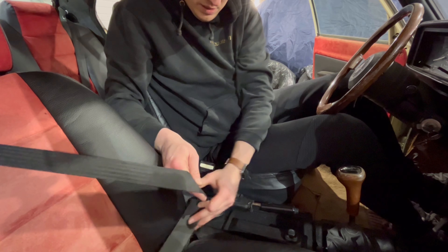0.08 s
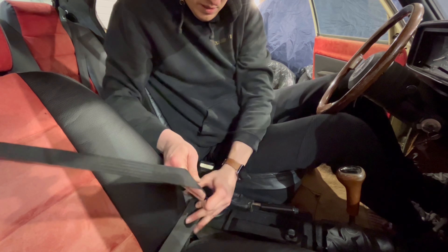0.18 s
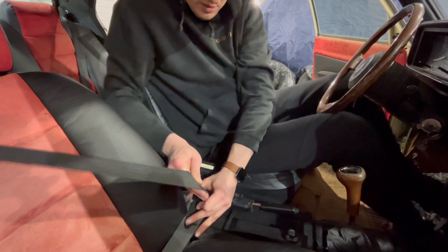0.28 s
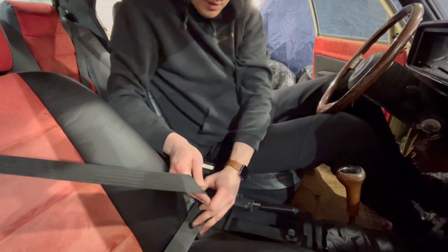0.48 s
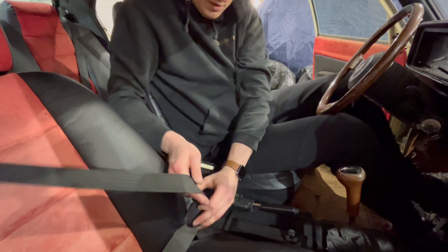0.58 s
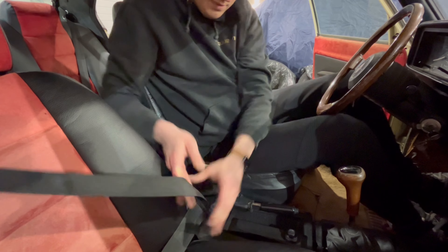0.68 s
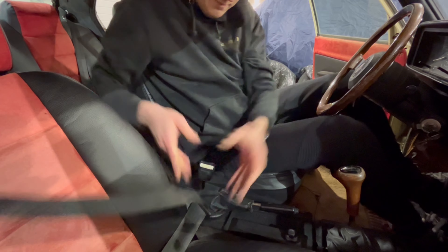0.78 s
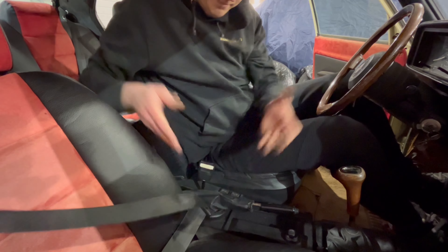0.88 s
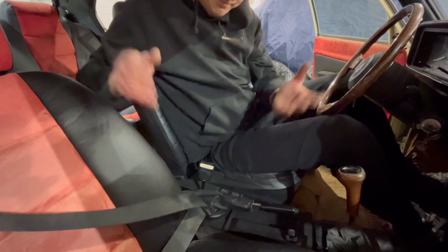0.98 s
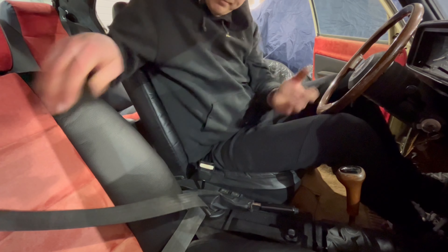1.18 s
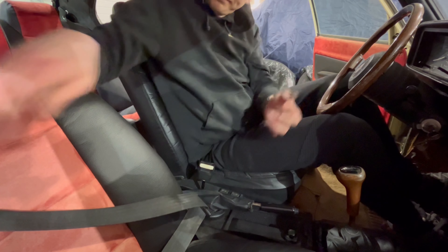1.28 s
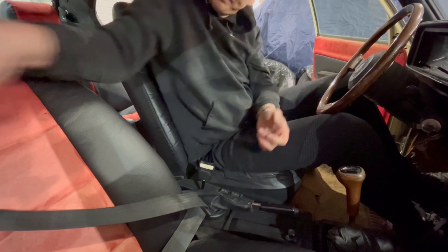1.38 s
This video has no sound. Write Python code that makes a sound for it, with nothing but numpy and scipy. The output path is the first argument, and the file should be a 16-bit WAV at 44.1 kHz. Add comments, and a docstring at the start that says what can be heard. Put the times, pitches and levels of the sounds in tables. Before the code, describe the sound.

A seat belt clicks into its buckle with rustling sleeves inside a parked car.

```python
"""A seat belt is fastened inside a parked car. Over a faint hiss, sleeves rustle, the belt slides and a body
shifts on the seat. The steel tongue (the belt's metal tip) taps at the buckle, then knocks along the slot as
the cabin booms softly. At 0.3 s the latch snaps shut and its steel rings briefly. The hands let go with a few
lighter taps and thuds. The small cabin gives each click a short echo."""
import sys
import numpy as np
from scipy import signal
from scipy.fft import rfft, irfft
from scipy.io import wavfile

SR = 44100
rng = np.random.default_rng(int(sys.argv[2]) if len(sys.argv) > 2 else 0)


def dump_mix(stems):
    """Bounce the given channels to the path in sys.argv[1] as a 16-bit WAV at rate SR."""
    frames = np.atleast_2d(stems).T  # one column per channel
    limited = np.clip(frames, -1, 1)  # hard clip at full scale
    pcm = np.round(limited * 32767).astype(np.int16)
    wavfile.write(sys.argv[1], SR, pcm)


N = 61740  # 1.4 s

# How alike the two ears' noise is, 1 meaning the same (frequency [Hz], likeness [-1 to 1])
EAR_LIKENESS = [(60, .95), (130, 1), (300, 0.33), (600, 0.22), (1200, 0.02), (5000, -0.13), (12000, .3)]
# Which side nearby sounds lean to (frequency [Hz], left minus right [dB])
NEAR_SIDES = [(60, -4), (200, -0.5), (700, 2.5), (1300, 3.6), (2400, 2), (4400, 8.5), (8000, -0.5),
              (15000, -1)]
# Tone colour of the hiss: how strong its lows and highs are (frequency [Hz], level [dB])
HISS_COLOUR = [(20, -12), (70, 7.5), (180, -10), (300, -21), (500, -18), (750, -8), (1000, -1.5),
               (1230, -3), (1600, -7.5), (2200, -13.5), (6000, -23.5), (16000, -32)]
# Which side the hiss leans to (frequency [Hz], left minus right [dB])
HISS_SIDES = [(100, -6), (700, -2.5), (1290, 16), (2400, 6), (4400, 1.5), (8000, -6)]
# Loudness of the rubbing sleeves (time [s], level [dB])
SLEEVE_LEVELS = [(0, -53), (0.06, -46.5), (0.12, -48.5), (0.2, -48), (0.27, -47.5), (0.4, -58.5),
                 (0.48, -73), (0.56, -59.5), (0.639, -62.5), (0.75, -59), (0.79, -65), (0.83, -63),
                 (0.9, -74), (1.049, -77), (1.14, -79.5), (1.34, -77), (1.39, -71)]
# Tone colour of the sleeves (frequency [Hz], level [dB])
SLEEVE_COLOUR = [(200, -12.5), (500, -9), (900, 4), (1500, 4.5), (2400, -3), (4500, -4.5), (7000, -11.5),
                 (12700, -20), (16000, -29)]
# Loudness of the sliding belt (time [s], level [dB])
BELT_LEVELS = [(0, -64), (0.17, -52.5), (0.28, -62), (0.4, -64.5), (0.48, -72), (0.57, -70), (0.64, -61.5),
               (0.72, -66), (0.79, -65.5), (0.82, -65.5), (0.87, -71.5), (0.98, -73.5), (1.07, -69.5),
               (1.14, -83), (1.34, -76.5), (1.39, -64.5)]
# Tone colour of the belt (frequency [Hz], level [dB])
BELT_COLOUR = [(500, -10), (2000, -8.5), (5500, 6.5), (8500, -0.5), (10500, -2.5), (12800, 3.5),
               (15000, -7), (16000, -13)]
# Loudness of the body rubbing on the seat (time [s], level [dB])
BODY_LEVELS = [(0, -57), (0.07, -66.5), (0.088, -42.5), (0.188, -47.5), (0.225, -42), (0.291, -36),
               (0.34, -39), (0.401, -49), (0.5, -52.5), (0.62, -61), (0.719, -68), (0.83, -65.5),
               (0.95, -74), (1.4, -70.5)]
# Tone colour of that rubbing (frequency [Hz], level [dB])
BODY_COLOUR = [(20, -12.5), (45, 4.5), (85, 6.5), (150, -2), (240, -1.5), (330, -13), (600, -12.5),
               (1000, -23.5), (3000, -52.5)]
# Light taps of tongue, buckle and belt (time [s], level [dB], brightness [dB/octave], ring [dB])
LIGHT_TAPS = [(0.0223, -43.5, -1, 5), (0.0742, -36.5, 0, -3.5), (0.081, -40.5, -42, -10),
              (0.0897, -33, -0.5, 1), (0.1054, -35.5, 3.5, -2), (0.134, -40, -12, -25),
              (0.1575, -43.5, 6.5, -42), (0.4352, -40.5, 2, -23), (0.4594, -49, -0.5, -42),
              (0.5087, -46.5, 0.5, -36), (0.8005, -51, -2.5, -12), (0.81, -51.5, 2, -46),
              (0.821, -69, 0, -14), (0.8764, -58, 3, 0)]
# Tone colour of a tap (frequency [Hz], level [dB])
LIGHT_TAP_COLOUR = [(150, -21), (450, 9), (900, 4), (1600, -2.5), (2400, -6), (5500, -6), (8000, -9.5),
                    (10500, -17.5), (12500, -7.5), (16000, -30)]
# Notes of the loose tongue; a fade is the time to drop 60 dB (pitch [Hz], level [dB], fade [s])
TONGUE_NOTES = [(1230, -11, 0.12), (1555, -10, 0.15), (1610, -5.5, 0.15), (1630, -5.5, 0.045),
                (4970, -20, 0.027)]
# Soft low booms of the cabin (time [s], level [dB], pitch [Hz], fade [s])
CABIN_THUDS = [(0.086, -52, 99, 0.18), (0.128, -65, 119, 0.045), (0.186, -54, 86.5, 0.09),
               (0.217, -21.5, 132.8, 0.28), (0.245, -26, 83.5, 0.29), (0.281, -37, 127.4, 0.14),
               (0.311, -26.5, 176.7, 0.066), (0.334, -33.5, 89.5, 0.12), (0.444, -22.5, 143, 0.056),
               (0.467, -40.5, 89.9, 0.47), (0.552, -43.5, 85.8, 0.35), (0.749, -36.5, 81.4, 0.18),
               (0.797, -33.5, 188.7, 0.05), (0.813, -48.5, 89, 0.29), (1.039, -49.5, 83, 0.24),
               (1.178, -51.5, 137.6, 0.11)]
# The tongue knocking along the slot (time [s], level [dB], brightness [dB/octave], ring [dB])
KNOCKS = [(0.2043, -29, -1.5, -7.5), (0.2075, -28, 6.5, -11), (0.2090, -26, 1.5, 2.5), (0.2175, -26, -2, 5),
          (0.2265, -20.5, -1.5, -17)]
# Tone colour of a knock (frequency [Hz], level [dB])
KNOCK_COLOUR = [(150, 15.5), (350, -7.5), (600, -2), (1100, -3), (1600, 3), (2400, -4), (3300, -1),
                (5000, -10), (8000, -9), (10500, -19), (13000, -16.5), (16000, -36)]
# Notes of the buckle's case (pitch [Hz], level [dB], fade [s])
CASE_NOTES = [(334, -10, .17), (420, -11, .14), (535, -5, .07), (750, -14, .07), (954, -2, .07),
              (1086, -3, .06), (1148, -4, .06), (1500, -13, .04), (1598, -15, .08), (3250, -17, .025)]
# The latch's snap and bounces (time [s], level [dB], brightness [dB/octave], ring [dB])
SNAPS = [(0.3027, -17, 1, -7.5), (0.3047, -17.5, 2.5, -3.5), (0.3074, -21, 5.5, -1.5),
         (0.3142, -30, -0.5, 2.5), (0.3245, -28.5, -3.5, -13), (0.3312, -32.5, -6.5, -5)]
# Tone colour of a snap (frequency [Hz], level [dB])
SNAP_COLOUR = [(150, -14.5), (500, -13), (850, -22.5), (1150, -8), (1600, 5.5), (2500, -8.5), (3100, 3),
               (3500, -0.5), (4200, -6), (7000, -7), (9500, -13), (11800, -4), (14000, -15.5),
               (16000, -30.5)]
# Notes of the steel latch and tongue (pitch [Hz], level [dB], fade [s])
STEEL_NOTES = [(1095, -5, .04), (1150, -2, .05), (1478, -9, .08), (1594, -7, .07), (1660, -8, .03),
               (2077, -8, .03), (3080, -7, .02), (3272, -6, .045), (3680, -12, .035), (4082, -10, .035),
               (4930, -15, .03), (5800, -15, .025), (10200, -17, .02), (11750, -11, .015)]
# How long the cabin echoes (frequency [Hz], fade [s])
ECHO_FADES = [(100, 0.21), (500, 0.13), (1400, 0.72), (3000, 0.57), (8000, 0.93), (15000, .3)]
# Tone colour of the echo (frequency [Hz], level [dB])
ECHO_COLOUR = [(100, -1.5), (500, -8.5), (1150, -20), (1600, -19.5), (3000, -26.5), (8000, -26.5),
               (15000, -40)]


def amp(db):
    """Turns decibels into a number to multiply by."""
    return 10 ** (np.asarray(db) / 20)


def read(table, hz):
    """Looks up a frequency in a table, gliding between its rows."""
    freqs, values = np.transpose(table)
    return np.interp(np.log(hz + 1), np.log(freqs + 1), values)


def loudness(table):
    """Turns (time, level) rows into a volume for every sample."""
    return amp(np.interp(np.arange(N) / SR, *np.transpose(table)))


def pan(db):
    """Left and right volumes, with the left louder by db."""
    return amp(np.array([[.5], [-.5]]) * db)


def add(mix, start_s, sound):
    """Mixes a sound in at the given time."""
    part = mix[:, max(round(start_s * SR), 0):][:, :sound.shape[1]]
    part += sound[:, :part.shape[1]]


def two_ears(noise):
    """Blends two noises into left and right spectra that are alike in the bass."""
    hz = np.fft.rfftfreq(noise.shape[1], 1 / SR)
    left, other = rfft(noise)
    alike = np.clip(read(EAR_LIKENESS, hz), -1, 1)
    return hz, np.array([left, alike * left + np.sqrt(1 - alike ** 2) * other])


def noise_bands(size):
    """Splits stereo noise into narrow bands (centre [Hz], share of the power, noise)."""
    hz, spectrum = two_ears(rng.standard_normal((2, size)))
    centres = np.geomspace(150, 16000, 36)
    for centre, pick in zip(centres, np.eye(len(centres))):
        band = np.sqrt(np.interp(hz, centres, pick, left=0))
        yield centre, centre / centres.sum(), irfft(spectrum * band, size)


def steady_noise(colour, sides, grain_db=0):
    """Coloured noise of average (rms) size 1; grain_db makes it gritty."""
    grains = np.minimum(rng.exponential(1, N // 32 + 1), 4)
    grit = amp(grain_db * np.repeat(grains, 32)[:N])
    hz, spectrum = two_ears(rng.standard_normal((2, N)) * grit)
    noise = irfft(spectrum * amp(read(colour, hz)) * pan(read(sides, hz)), N)
    return noise / np.sqrt(np.mean(noise ** 2) + 1e-20)


def hiss():
    """A faint, even hiss lies under everything."""
    return amp(-62.5) * steady_noise(HISS_COLOUR, HISS_SIDES)


def rustle():
    """Sleeves rub in fine grains; the belt slides with a brighter hiss."""
    sleeves = steady_noise(SLEEVE_COLOUR, NEAR_SIDES, grain_db=1) * loudness(SLEEVE_LEVELS)
    belt = steady_noise(BELT_COLOUR, NEAR_SIDES, grain_db=1) * loudness(BELT_LEVELS)
    return sleeves + belt


def body_shift():
    """A body moving on the cushion makes a dull rub."""
    return steady_noise(BODY_COLOUR, NEAR_SIDES) * loudness(BODY_LEVELS)


def ringing(scrape, hz, fade_s):
    """One note of a struck part, shaken by the scrape near its pitch; energy 1 in each ear."""
    near_pitch = signal.butter(2, [hz / 1.45, hz * 1.45], "bandpass", fs=SR, output="sos")
    step = np.exp((2j * np.pi * hz - np.log(1000) / fade_s) / SR)  # swing and fade per sample
    ring = signal.lfilter([1], [1, -step], signal.sosfilt(near_pitch, scrape)).imag
    return ring / np.linalg.norm(ring, axis=1, keepdims=True)


def strikes(hits, colour, notes, rise_s, low_fade_s, high_fade_s, scrape_s):
    """Each hit is a crack, scattered by nearby surfaces, and a brief scrape that rings the part."""
    out, t = np.zeros((2, N)), np.arange(6144) / SR
    rise, scatter = 1 - np.exp(-t / rise_s), []
    for hz, share, noise in noise_bands(len(t)):
        fade_s = read([(1000, low_fade_s), (12000, high_fade_s)], hz)
        shape = rise * amp(-60 * t / fade_s)
        burst = noise * shape
        burst *= np.linalg.norm(shape) / np.linalg.norm(burst, axis=1, keepdims=True)
        scatter.append((hz, share, pan(read(NEAR_SIDES, hz)) * burst))
    centres, shares, bursts = map(np.array, zip(*scatter))
    for start_s, db, brightness, ring_db in hits:
        gains = np.sqrt(shares) * amp(read(colour, centres) + brightness * np.log2(centres))
        crack = np.tensordot(gains / np.linalg.norm(gains), bursts, 1)  # adds up the bands
        _, spectrum = two_ears(rng.standard_normal((2, len(t))))
        scrape = irfft(spectrum) * rise * np.exp(-t / scrape_s)
        ring = 0
        for hz, note_db, fade_s in notes:
            lift_db = 0.45 * brightness * np.log2(hz / notes[0][0])  # brighter hit, brighter ring
            ring += pan(read(NEAR_SIDES, hz)) * amp(note_db + lift_db) * ringing(scrape, hz, fade_s)
        ring *= amp(ring_db) * np.linalg.norm(crack[0])  # ring_db is relative to the crack
        add(out, start_s, amp(db) * (crack + ring))
    return out


def tongue_taps():
    """Light taps ring the tongue as the hands aim it and later let go."""
    return strikes(LIGHT_TAPS, LIGHT_TAP_COLOUR, TONGUE_NOTES,
                   rise_s=.0008, low_fade_s=.055, high_fade_s=.027, scrape_s=.003)


def cabin_thuds():
    """The cabin booms with low notes that die quickly."""
    rise_s, overtone_ratio = 0.01, 1.65
    out, t = np.zeros((2, N)), np.arange(SR // 2) / SR
    for start_s, db, hz, fade_s in CABIN_THUDS:
        phase = 2 * np.pi * hz * t
        tone = np.sin(phase) + amp(-15) * np.sin(overtone_ratio * phase)
        rise = 1 - np.exp(-(t / rise_s) ** 2)
        add(out, start_s, pan(-3) * tone * rise * amp(db - 60 * t / fade_s))
    # The thuds are thinned out below about 69 Hz.
    return signal.sosfilt(signal.butter(3, 68.9, "highpass", fs=SR, output="sos"), out)


def slot_knocks():
    """The tongue knocks along the slot and rings the buckle's case."""
    return strikes(KNOCKS, KNOCK_COLOUR, CASE_NOTES,
                   rise_s=.0006, low_fade_s=.042, high_fade_s=.039, scrape_s=.0012)


def latch_snap():
    """The latch snaps shut and bounces, ringing the steel."""
    return strikes(SNAPS, SNAP_COLOUR, STEEL_NOTES,
                   rise_s=.00015, low_fade_s=.034, high_fade_s=.025, scrape_s=.0008)


def cabin_echo(sound):
    """The cabin adds a weak, blurred echo, each band dying at its own speed."""
    t, tail = np.arange(SR // 2) / SR, 0
    for hz, share, noise in noise_bands(len(t)):
        fading = noise * amp(-60 * t / read(ECHO_FADES, hz))
        tail += amp(read(ECHO_COLOUR, hz)) * np.sqrt(share) * fading / np.linalg.norm(fading[0])
    return signal.fftconvolve(sound, tail, axes=1)[:, :N]


def scene():
    """Mixes the buckle's clicks and their echo with the cabin's booms, the body on the seat, cloth and hiss."""
    clicks = tongue_taps() + slot_knocks() + latch_snap()
    return clicks + cabin_echo(clicks) + cabin_thuds() + body_shift() + rustle() + hiss()


def record(dry):
    """Cuts the highest treble, above 15700 Hz."""
    treble_cut = signal.firwin(255, 15700, window=("kaiser", 9), fs=SR)
    return signal.oaconvolve(dry, treble_cut[None], "same")


dry = scene()
out = record(dry)
dump_mix(out)
```